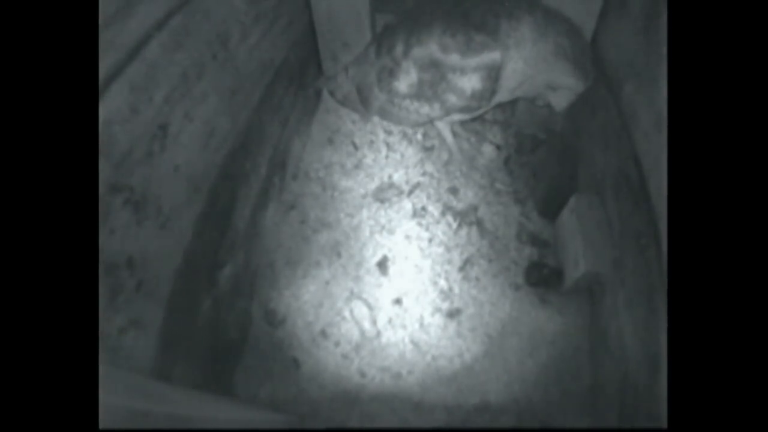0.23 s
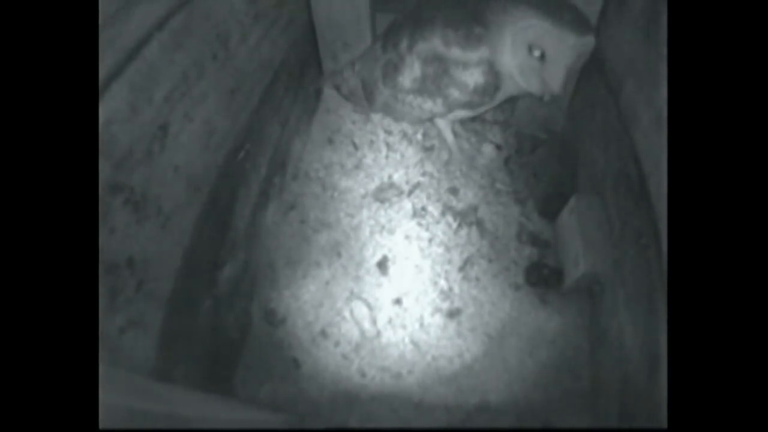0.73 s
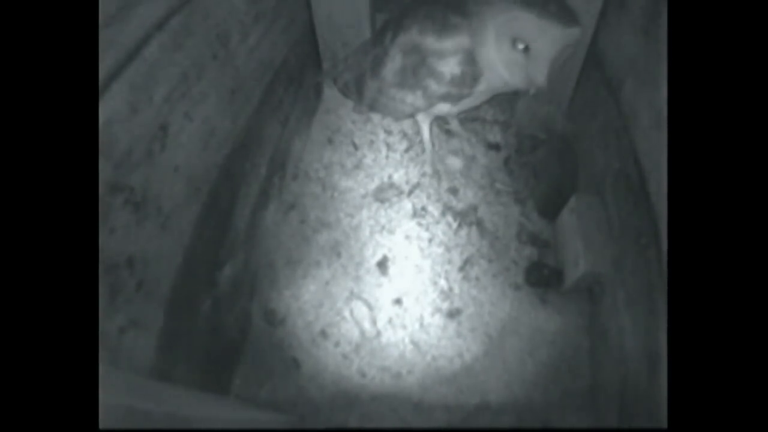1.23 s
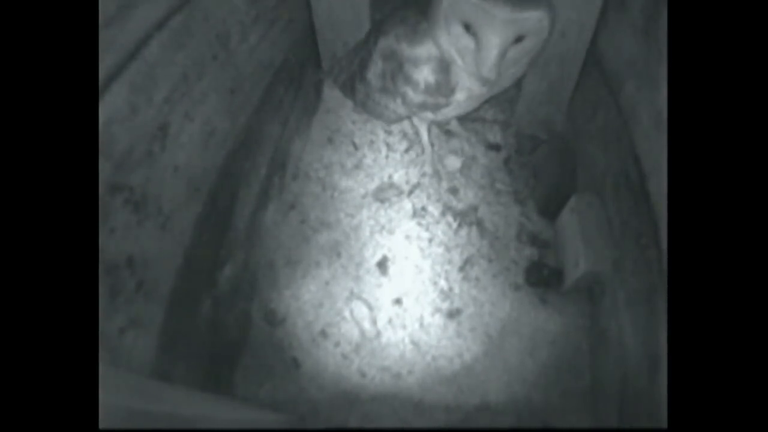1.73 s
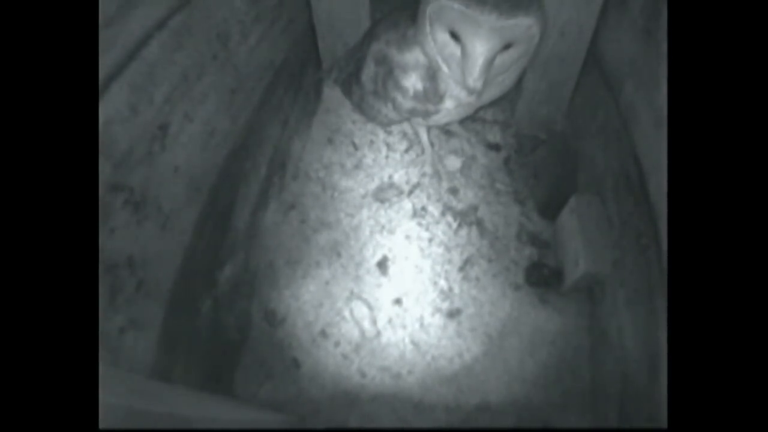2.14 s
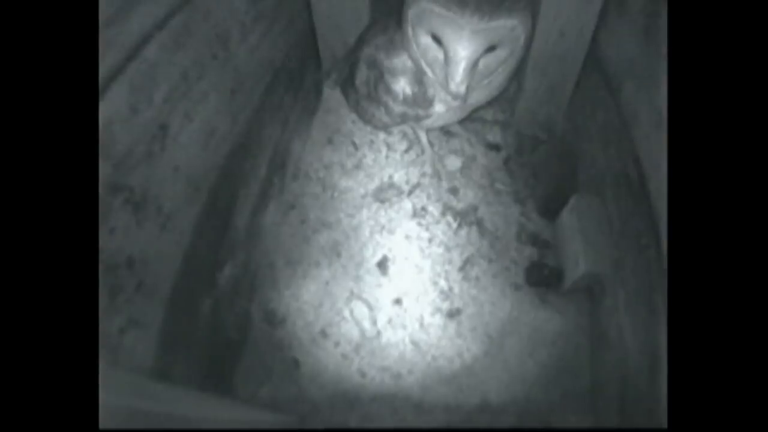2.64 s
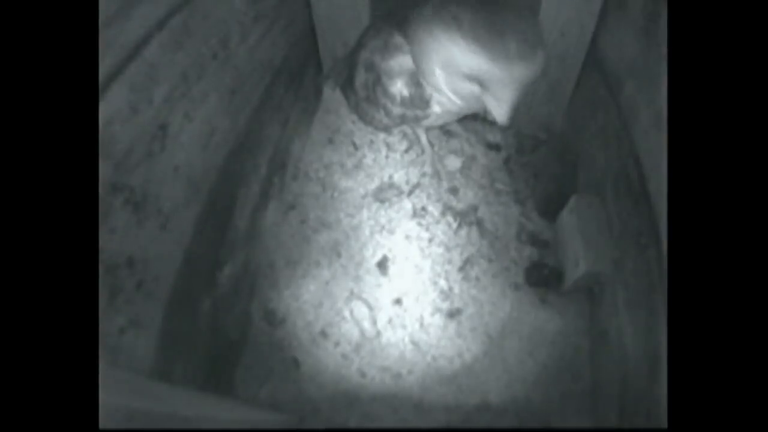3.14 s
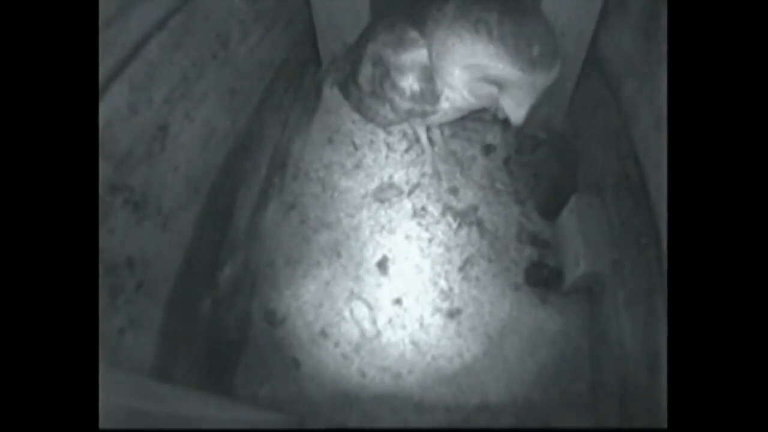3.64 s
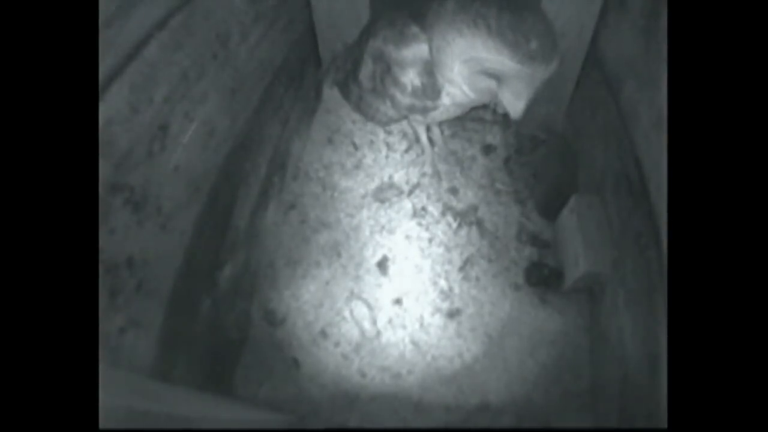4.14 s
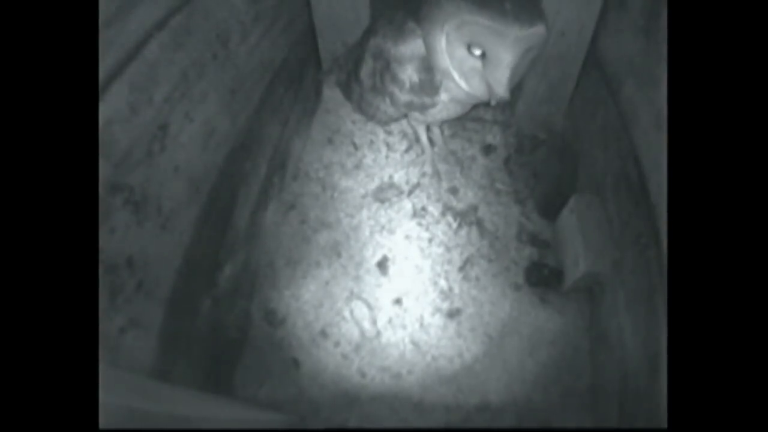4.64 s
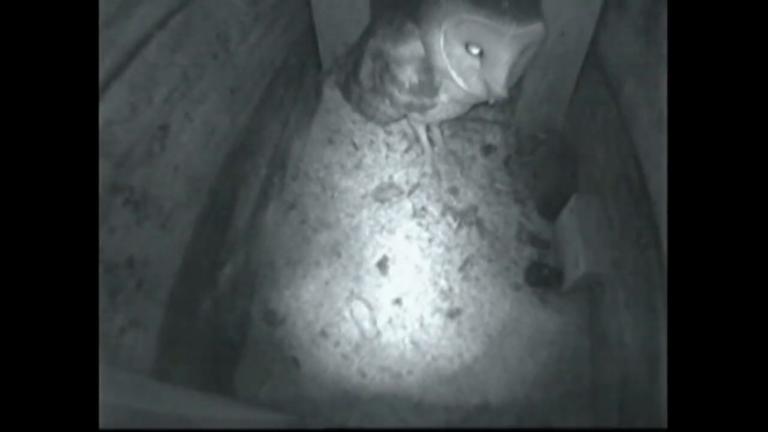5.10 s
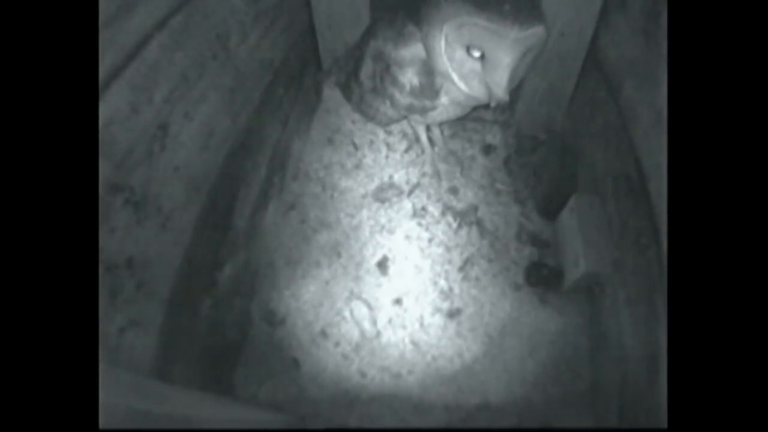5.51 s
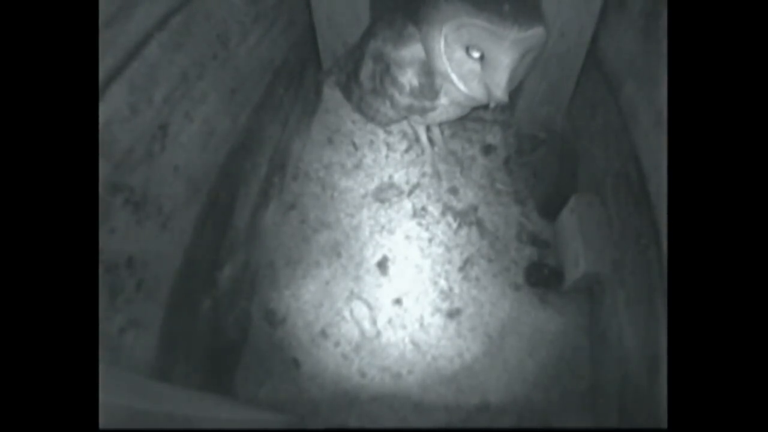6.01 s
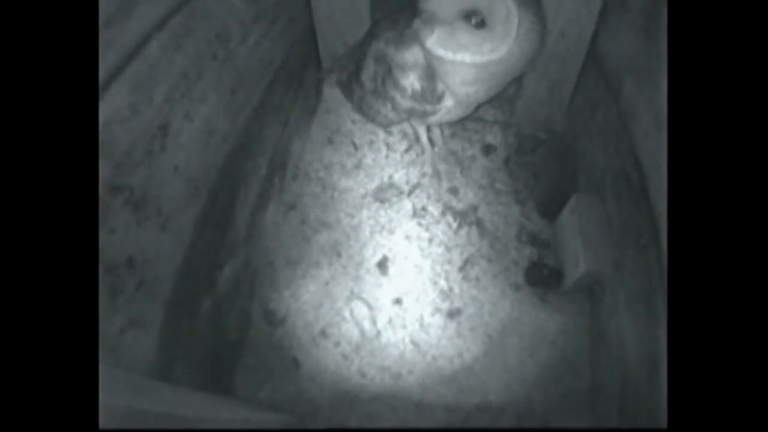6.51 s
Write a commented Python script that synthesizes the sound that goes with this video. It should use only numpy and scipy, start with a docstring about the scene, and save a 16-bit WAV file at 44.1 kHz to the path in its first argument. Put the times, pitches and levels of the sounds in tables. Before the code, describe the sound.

Inside a small wooden nest box, a barn owl gives three short, rough, hissing screeches with tiny chirps and squeaks at their edges, about a second or more apart. Soft knocks on wood come near the first screech and before the second. Later a far, soft, dove-like coo is barely heard, then a very faint knock. A close camera microphone adds steady high whine, buzz and low rumble, almost all on one side.

```python
"""In a wooden nest box, a barn owl gives three short rasping screeches, each begun and ended by clean chirps.
Slaps and puffs of the syrinx ring throat and beak resonances; chirps, throat pops and a far dove-like hoot are
gliding tones, and three soft knocks are decaying panel modes. Two scanning circuits of the camera leak a steady
whine and buzz, built from switched supply currents, into the one live channel, over low rumble of shaped noise.
The other channel is idle, with only faint hum and hiss. Live levels are given before a final doubling."""
import sys
import numpy as np
from scipy import signal
from scipy.fft import rfft, irfft
from scipy.io import wavfile
from scipy.ndimage import uniform_filter1d

SR = 44100
rng = np.random.default_rng(int(sys.argv[2]) if len(sys.argv) > 2 else 0)


def dump(signal):
    """Clip the signal to [-1, 1] and save it as 16-bit WAV at the path in sys.argv[1]."""
    limited = np.clip(np.atleast_2d(signal).T, -1, 1)
    pcm = np.round(limited * 32767).astype(np.int16)
    wavfile.write(sys.argv[1], SR, pcm)


N = 298116  # length in samples

# The owl at full effort, one row a screech, before catches and wall dips: low throat level/dB,
# upper throat level/dB, beak hiss level/dB, whistle level/dB, beak gap first f/Hz, beak gap last f/Hz
SCREECH_LEVELS = [(-32, -35.5, -45.5, -38.5, 5400, 5050), (-32.5, -34, -45.5, -37, 4800, 4960),
                  (-33, -35.5, -45, -34, 4900, 5020)]
# How hard the owl blows, one curve a screech: t/s, effort level/dB re full, strained whistle f/Hz
EFFORT_CURVES = [
    [(1.03, -10, 2140), (1.07, -5.5, 2290), (1.12, -2, 2310), (1.19, -2.5, 2270), (1.304, 0.5, 2330),
     (1.345, -2, 2140)],
    [(2.94, -22, 2220), (2.955, -5.5, 2200), (3.0, -4, 2200), (3.066, -3.5, 2120), (3.158, 0, 2250),
     (3.254, -2, 2280), (3.28, -4.5, 2160), (3.295, -17, 2100)],
    [(4.305, -11, 2440), (4.322, -11, 2440), (4.334, -5.5, 2430), (4.366, -2.5, 2480), (4.406, -4.5, 2390),
     (4.466, -2, 2260), (4.552, -1, 2480), (4.61, -4, 2250)],
]
# Resonances of throat, beak and box: f/Hz, width/Hz, relative level/dB
LOW_THROAT_MODES = [(328.5, 52, 1), (763, 247, 9.5), (924, 185, 8.5), (1180, 430, -27)]
UPPER_THROAT_MODES = [(1682, 570, 11.5), (1889, 157, 4), (2116, 188, 5), (2710, 79, 0.5), (3290, 285, -6.5),
                      (3800, 460, -5.5)]
BEAK_MODES = [(4760, 220, -10), (4850, 550, 3), (5316, 340, 17.5), (5680, 420, 15.5), (6020, 170, 11.5),
              (8000, 1400, 19), (11100, 1500, -2), (13200, 300, -3)]
# The voice catches: centre t/s, half length/ms, level/dB
VOICE_CATCHES = [(1.045, 8, 2), (1.106, 6, -4), (2.976, 3.1, -11), (3.041, 3, -9), (3.059, 6.1, -6.5),
                 (3.078, 6.3, -14), (4.408, 1.7, -18), (4.436, 2.8, -10)]
# Wall reflections in the box cancel here: f/Hz, width/Hz
WALL_CANCELLATIONS = [(420, 58), (1330, 244), (4200, 250), (7000, 1900)]
LOW_FOLLOWS, UPPER_FOLLOWS, HISS_FOLLOWS, WHISTLE_FOLLOWS = 0.7, 1.4, 1.57, 1.53  # dB per dB of effort
GAP_SETTLES = 0.81  # the beak gap moves from first to last pitch along this power of the time share
SLAP_HZ, SLAP_RATE_SPREAD_DB, SLAP_SIZE_LIMIT_DB = 260.0, 5.0, 6.7


def screech(levels, curve):
    """Uneven slaps of the syrinx and the air puffed with each one ring the throat; the beak adds hiss."""
    low_db, upper_db, hiss_db, whistle_db, first_gap_hz, last_gap_hz = levels
    times, effort_points, whistle_points = np.transpose(curve)
    t = np.arange(times[0], times[-1], 1 / SR)
    effort = np.interp(t, times, effort_points)
    whistle_hz = np.interp(t, times, whistle_points)
    low_db = low_db + LOW_FOLLOWS * effort
    upper_db = upper_db + UPPER_FOLLOWS * effort
    hiss_db = hiss_db + HISS_FOLLOWS * effort
    whistle_db = whistle_db + WHISTLE_FOLLOWS * effort
    gap_share = np.linspace(0, 1, len(t)) ** GAP_SETTLES
    gap_hz = first_gap_hz + (last_gap_hz - first_gap_hz) * gap_share

    wander, size, air = rng.standard_normal((len(t), 3)).T
    slap_rate = SLAP_HZ * gain_of(SLAP_RATE_SPREAD_DB * evened(uniform_filter1d(wander, 150)))
    turns = np.cumsum(slap_rate) / SR
    # one impulse for each completed turn, of uneven size
    slaps = np.diff(np.floor(turns), prepend=0) * gain_of(SLAP_SIZE_LIMIT_DB * np.tanh(size))
    # each slap swells a steady breath, then the swell dies away
    puffs = (3.7 + evened(signal.lfilter([1], [1, -.98], slaps))) * air

    voice = gain_of(whistle_db) * steadied(whistle(whistle_hz, puffs), 0.69)
    # rough: share of puffed air in the drive
    for modes, level_db, rough in [(LOW_THROAT_MODES, low_db, .35),
                                   (UPPER_THROAT_MODES, upper_db, .6),
                                   (BEAK_MODES, hiss_db, .85)]:
        drive = (1 - rough) * evened(slaps) + rough * evened(puffs)
        rings = sum(gain_of(db) * evened(resonate(drive, hz, width)) for hz, width, db in modes)
        voice = voice + gain_of(level_db) * steadied(rings, 0.37)
    # air sings across the gap of the beak
    voice = voice + gain_of(hiss_db - 5.0) * evened(resonate(puffs, gap_hz, 340.0))

    for centre, half_ms, db in VOICE_CATCHES:
        voice = voice * gain_of(db * np.exp(-((t - centre) * 1000 / half_ms) ** 4))
    for hz, width in WALL_CANCELLATIONS:
        voice = signal.lfilter(*signal.iirnotch(hz, hz / width, SR), voice)
    return times[0], voice * signal.windows.tukey(len(t), .04)


def whistle(hz, air):
    """The syrinx tries to hold a tone but wavers: a fuzzy line with its octave."""
    swing = signal.hilbert(evened(resonate(air, hz, 250.0)))
    octave = swing ** 2 / (abs(swing) + 1e-9)
    return (swing + gain_of(-14.5) * octave).real


# Clean chirps of the owl, opening and closing a screech:
# centre t/s, fundamental level/dB, f/Hz, glide/(Hz per ms), nominal length/ms
CLEAN_CHIRPS = [(1.03, -23.5, 976, 2.5, 8.9), (1.363, -30.5, 958, -11.5, 24), (2.95, -37.5, 1124, -10, 18),
                (3.313, -29.5, 940, 0, 18), (4.31, -26.5, 962, -2.5, 11), (4.316, -29, 1034, -1, 4.6)]
CHIRP_OCTAVE_DB, CHIRP_THIRD_DB = -15.5, -36  # partials re fundamental, here and below
# Squeaks of the owl as the rasp stops: centre t/s, fundamental level/dB, f/Hz, glide/(Hz per ms),
# nominal length/ms, third partial level/dB
END_SQUEAKS = [(1.351, -32.5, 1943, -10, 24, -10), (3.291, -35, 1930, -5, 16, -23),
               (4.614, -35.5, 2000, -4, 30, -9)]
SQUEAK_OCTAVE_DB = -30
# Throat pops inside the rasp: centre t/s, fundamental level/dB, f/Hz
THROAT_POPS = [(1.062, -32, 820), (1.079, -32, 920), (1.088, -20.5, 885), (1.096, -23, 900),
               (1.121, -26, 835), (1.152, -22, 940), (1.192, -23, 890), (1.205, -26, 884),
               (1.238, -21, 880), (1.250, -20.5, 954), (2.957, -42, 856), (2.970, -31, 896),
               (3.049, -35, 870), (3.071, -23, 850), (4.403, -29, 840), (4.431, -27, 855),
               (4.446, -23.5, 864), (4.462, -27, 820), (4.469, -25.5, 830), (4.484, -24, 840)]
POP_MS, POP_OCTAVE_DB, POP_THIRD_DB = 4.59, -16, -30


def chirp(centre, db, hz, glide, length_ms, octave_db, third_db):
    """A brief regular swing of the syrinx, gliding and wandering in pitch; the third partial dies first."""
    ms = np.arange(-length_ms, length_ms, 1000 / SR)
    wander_hz = 35.0 * evened(uniform_filter1d(rng.standard_normal(len(ms)), 60))
    phase = 2 * np.pi * np.cumsum(hz + glide * ms + wander_hz) / SR
    octave = gain_of(octave_db) * np.sin(2 * phase)
    third = gain_of(third_db - 20. * np.maximum(ms / length_ms, 0)) * np.sin(3 * phase)
    tone = np.sin(phase) + octave + third
    swell = np.exp(-(2 * ms / length_ms) ** 4 - (2.5 * ms / length_ms) ** 2)
    return centre - length_ms / 1000, gain_of(db) * tone * swell


# Camera scanning circuits: frame rate f/Hz, first line t/s, line rate f/Hz, pause per line t/s,
# extra step: lead before first line t/s, length t/s, height re line current
FAST_SCAN_TIMING = (59.9424, .0131697, 3933.755, 5.947e-5, .001133, .000203, 1.03)
SLOW_SCAN_TIMING = (24.9544, .0138272, 1909.02, 1.438e-4, .000764, .031984, .84)
LINES_PER_FRAME = 59


def scan(timing, db, coupling_hz, drain_hz, spike_us):
    """Supply current, on for each line with a short pause and stepped once a frame, seen through capacitors."""
    frame_hz, start, line_hz, pause, lead, length, height = timing
    size = 2 ** 15  # points in one frame
    hz = frame_hz * np.arange(1, size // 2 + 1)
    s = 2j * np.pi * hz

    def pulse(begin, duration):
        """Spectrum of a current switched on, then off."""
        return (np.exp(-s * begin) - np.exp(-s * (begin + duration))) / s

    line_delay = np.exp(-s / line_hz)
    line_train = (1 - line_delay ** LINES_PER_FRAME) / (1 - line_delay)
    current = pulse(start, 1 / line_hz - pause) * line_train
    current = current + height * pulse(start - lead, length)
    current = current * hz / (hz - 1j * coupling_hz) * hz / (hz - 1j * drain_hz)
    current = current * (1 + s * spike_us / 1e6)  # each switching edge overshoots
    current = current * np.where(hz < 13650, 1, gain_of(-24)) * (hz < 16500)
    frame = irfft(np.r_[0, current]) * size * frame_hz
    place = np.arange(N) * frame_hz / SR % 1 * size
    return gain_of(db) * np.interp(place, np.arange(size), frame, period=size)


# Bumps on the box: t/s, strength level/dB, pitch factor
BOX_KNOCKS = [(1.286, -23.5, 0.84), (2.741, -31.5, 3.1), (6.525, -38, 0.95)]
# Modes of a panel at pitch factor 1: f/Hz, relative level/dB, t60/s
PANEL_MODES = [(141, 8.5, 0.069), (206, 3.5, 0.043), (330, 0, 0.021)]


def knock(s, db, pitch):
    """A foot or wing bumps a panel of the box; smaller panels ring higher and shorter."""
    t = np.arange(SR // 5) / SR * pitch  # time runs faster on a smaller panel
    ring = sum(gain_of(d - 60 * t / t60) * np.sin(2 * np.pi * f * t) for f, d, t60 in PANEL_MODES)
    return s, gain_of(db) * ring * (1 - np.exp(-t / 0.029))


# Far coos: start t/s, length t/s, end f/Hz, arch height f/Hz, time share of the pitch peak,
# rms level/dB before thinning and fades
FAR_HOOTS = [(5.342, 0.074, 300, 20, 0.18, -56.5), (5.607, .41, 304.4, 38, 0.61, -53.5)]
# level change at the top of the arch, faded share of the length, rms unsteadiness
HOOT_THINS_DB, HOOT_SOFT, HOOT_WAVER_DB = -7, 0.3, 1.5


def hoot(s, length, end_hz, arch_hz, top, db):
    """A far, soft, pure coo whose pitch rises and falls, thinning at the top."""
    share = np.linspace(0, 1, round(length * SR))
    arch = np.interp(share, [0, top, 1], [.3, 1, 0])
    smooth = uniform_filter1d(uniform_filter1d(rng.standard_normal(len(share)), 900), 900)
    tone = np.sqrt(2) * np.sin(2 * np.pi * np.cumsum(end_hz + arch_hz * arch) / SR)
    level_db = db + HOOT_THINS_DB * arch ** 7.4 + HOOT_WAVER_DB * evened(smooth)
    return s, gain_of(level_db) * tone * signal.windows.tukey(len(share), HOOT_SOFT)


# Wavering hum of the idle channel: f/Hz, width/Hz, rms level/dB
IDLE_HUM = [(297, 33, -71), (582, 59, -85), (870, 120, -88.5)]


def idle_hum():
    """Narrow bands of noise, partly levelled, heard as a faint wavering hum."""
    return sum(gain_of(db) * steadied(resonate(rng.standard_normal(N), hz, width), .7)
               for hz, width, db in IDLE_HUM)


# Rumble and hiss of the live channel: f/Hz, level/(dB per Hz)
LIVE_FLOOR = [(20, -85.5), (60, -83.5), (95, -69), (130, -74.5), (200, -100), (320, -85.5), (500, -92),
              (900, -101), (2000, -100), (3300, -105), (4000, -103), (5000, -106), (8000, -104),
              (13400, -108), (13800, -135), (16000, -135)]
# Hiss of the idle channel: f/Hz, level/(dB per Hz)
IDLE_FLOOR = [(20, -95), (120, -120), (900, -120), (2000, -128), (5000, -128), (9000, -140), (16000, -145)]


def noise(points):
    """Steady noise with the given power per Hz."""
    hz = np.fft.rfftfreq(N, 1 / SR)
    f, db = np.transpose(points)
    shape = gain_of(np.interp(np.log(hz + 1), np.log(f), db))
    return irfft(rfft(rng.standard_normal(N)) * shape, N) * np.sqrt(SR / 2)


def gain_of(db):
    """Decibels to gain."""
    return 10 ** (np.asarray(db) / 20)


def evened(x):
    """Scales to rms 1."""
    return x / np.sqrt(np.mean(x ** 2) + 1e-20)


def steadied(x, share):
    """Partly levels swells longer than 20 ms, as in a source with a steady supply; rms 1."""
    power = uniform_filter1d(x ** 2, SR // 50)
    return evened(x / (power + 1e-12) ** (share / 2))


def resonate(x, hz, width):
    """Shifts the curve hz down to zero, smooths twice, and shifts back: a steep resonance."""
    turn = np.exp(2j * np.pi * np.cumsum(hz * np.ones(len(x))) / SR)
    r = np.exp(-np.pi * width / SR)
    smooth = signal.lfilter([(1 - r) ** 2], [1, -2 * r, r * r], x / turn)
    return 2 * (turn * smooth).real


def add(mix, s, sound):
    """Mixes a sound in at time s."""
    part = mix[round(s * SR):][:len(sound)]
    part += sound[:len(part)]


def scene():
    """Owl, knocks, hoot, rumble and camera whine on the live channel; hum and hiss on the idle one."""
    air = noise(LIVE_FLOOR)
    for levels, curve in zip(SCREECH_LEVELS, EFFORT_CURVES):
        add(air, *screech(levels, curve))
    for row in CLEAN_CHIRPS:
        add(air, *chirp(*row, CHIRP_OCTAVE_DB, CHIRP_THIRD_DB))
    for *row, third_db in END_SQUEAKS:
        add(air, *chirp(*row, SQUEAK_OCTAVE_DB, third_db))
    for row in THROAT_POPS:
        add(air, *chirp(*row, 0, POP_MS, POP_OCTAVE_DB, POP_THIRD_DB))
    for row in BOX_KNOCKS:
        add(air, *knock(*row))
    for row in FAR_HOOTS:
        add(air, *hoot(*row))
    whine = scan(FAST_SCAN_TIMING, db=-38.5, coupling_hz=310, drain_hz=37, spike_us=4.9)
    buzz = scan(SLOW_SCAN_TIMING, db=-45.0, coupling_hz=213, drain_hz=8.0, spike_us=15.0)
    live = 2 * (air + whine + buzz)
    idle = idle_hum() + noise(IDLE_FLOOR)
    return np.array([live, idle])


EDGE_HZ = 15725  # upper band limit


def record(dry):
    """The band limit and a slight offset of the converter."""
    lowpass = signal.firwin(511, EDGE_HZ, window=("kaiser", 9), fs=SR)
    cut = signal.oaconvolve(dry, lowpass[None], "same")
    return cut - np.array([[.0001], [.0007]])  # offset of the live and the idle channel


dry = scene()
out = record(dry)
dump(out)
```